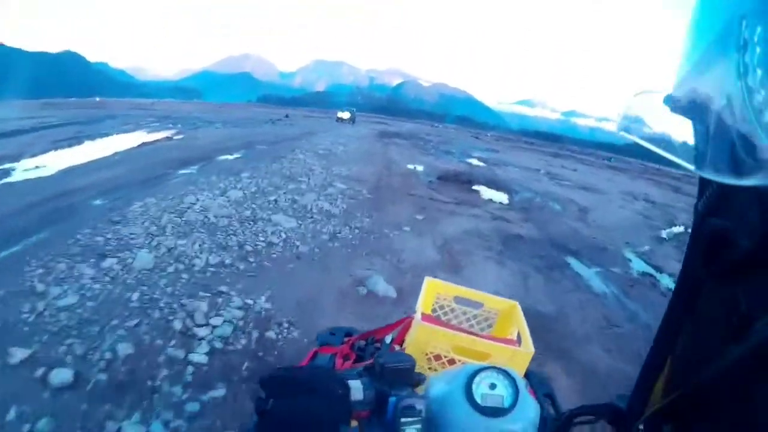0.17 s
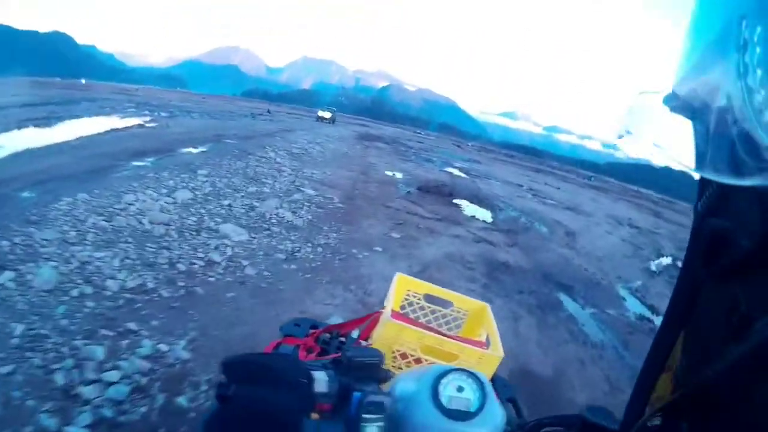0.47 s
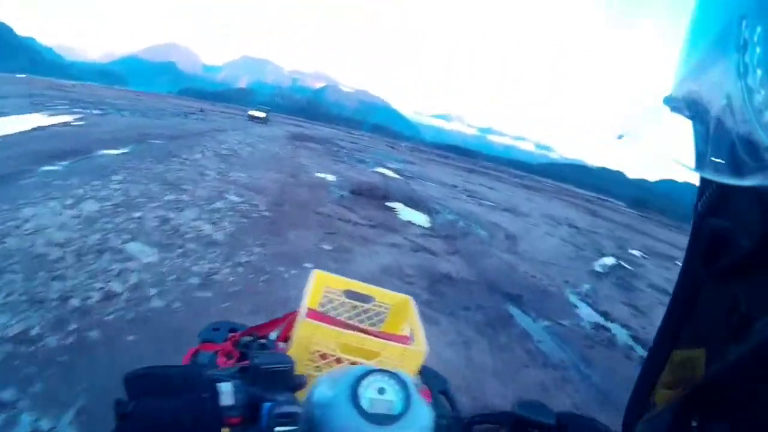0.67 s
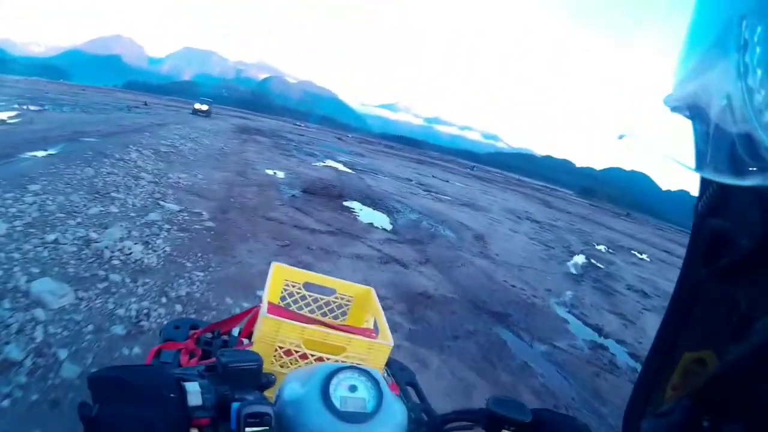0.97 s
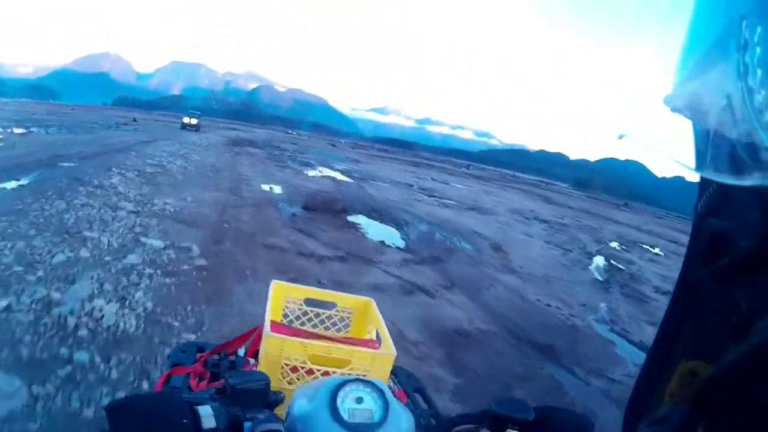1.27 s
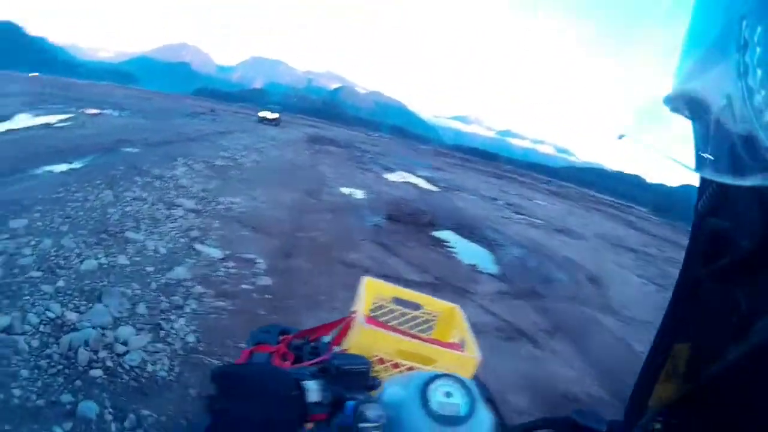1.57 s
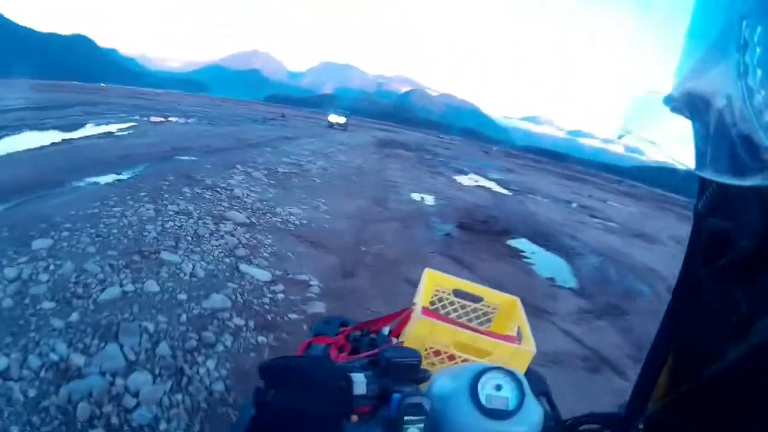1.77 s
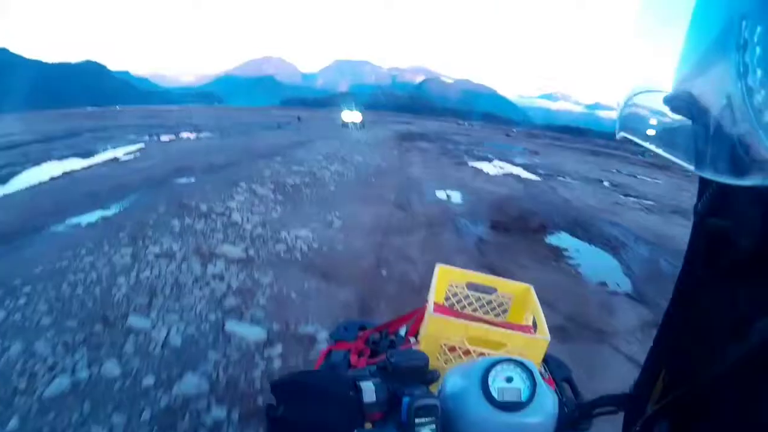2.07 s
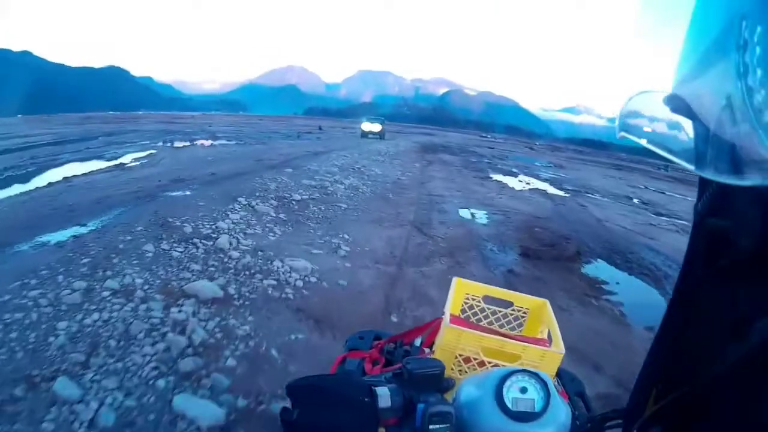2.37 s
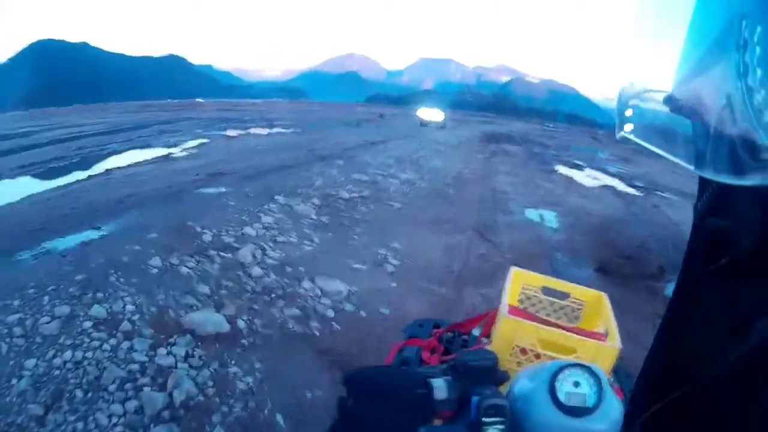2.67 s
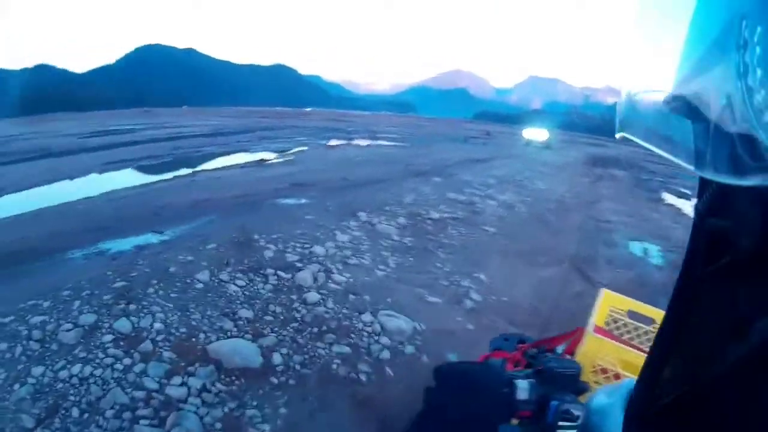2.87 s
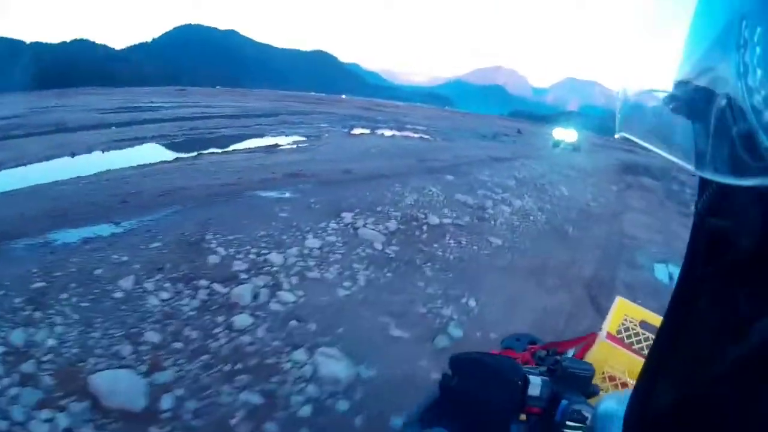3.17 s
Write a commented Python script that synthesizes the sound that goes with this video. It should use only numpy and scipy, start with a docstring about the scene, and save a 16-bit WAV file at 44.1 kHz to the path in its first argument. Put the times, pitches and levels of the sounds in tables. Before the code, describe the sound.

A quad bike engine runs continuously from 0 to 3.3 seconds, about 26 thumps a second fusing into a boomy, buzzing drone. Pitch wavers slightly and sags a little after 2 seconds. A rough, pulsing roar of gas, tyres and wind surrounds it. Brief dull rattles tick irregularly, clustering around 1.2-1.4 seconds. Open outdoors, close muffled mono microphone, with very faint hiss and thin high whine.

```python
"""On a gravel track a single-cylinder quad bike is ridden at a steady pace, heard by a muffled helmet camera.
Each firing thumps through the exhaust as a sum of harmonic orders whose phases shape the pulse.
Gas rush, tyres and wind are noise in the resonances of machine and housing, gusting with the engine cycle.
The load rattles as short decaying modes; the electronics add steady hiss and a cluster of thin whining lines."""
import sys
import numpy as np
from scipy import signal
from scipy.fft import rfft, irfft
from scipy.io import wavfile

SR = 44100
rng = np.random.default_rng(int(sys.argv[2]) if len(sys.argv) > 2 else 0)


def pcm_store(signal):
    """Save signal as 16-bit PCM."""
    levels = np.round(np.clip(np.atleast_2d(signal), -1, 1) * 32767)
    wavfile.write(sys.argv[1], SR, levels.astype(np.int16).T)


N = 146412


def amp(db):
    """Level law: decibels become a linear gain."""
    return 10 ** (np.asarray(db) / 20)


def rms_one(x):
    """Power normalization: scale a signal to rms 1."""
    return x / np.sqrt(np.mean(x ** 2) + 1e-20)


def in_time(rows):
    """Linear interpolation: the columns after the time column become curves with one value per sample."""
    s, *columns = np.transpose(rows)
    return [np.interp(np.arange(N) / SR, s, column) for column in columns]


def drift(rate_hz):
    """Low-passed noise: two equal real poles at rate_hz leave a slow random curve of spread 1."""
    step = 40  # samples between computed points
    r = np.exp(-2 * np.pi * rate_hz * step / SR)
    noise = rng.standard_normal(N // step + 2002)
    slow = signal.lfilter([1], [1, -2 * r, r * r], noise)[2000:]  # drop the settling of the filter
    return np.interp(np.arange(N) / step, np.arange(len(slow)), rms_one(slow))


def resonate(x, hz, width_hz):
    """Damped oscillator: a conjugate pole pair passes a band of the given width."""
    r = np.exp(-np.pi * width_hz / SR)
    return signal.lfilter([1 - r, 0, r - 1], [1, -2 * r * np.cos(2 * np.pi * hz / SR), r * r], x + 1e-18)


def wandering(hz, width_hz):
    """Heterodyning: low-passed complex noise on a gliding carrier is noise in a moving resonance."""
    r = np.exp(-np.pi * width_hz / SR)
    noise = rng.standard_normal(N) + 1j * rng.standard_normal(N)
    envelope = signal.lfilter([1], [1, -2 * r, r * r], noise)
    carrier = np.exp(2j * np.pi * np.cumsum(hz) / SR)
    return (envelope * carrier).real


def electronics():
    """Circuit noise: spectrally shaped hiss, and sinusoids broadened by phase drift."""
    # Spectrum of the hiss. Each row: frequency in Hz, relative level in dB.
    hiss_shape = [(3000, -4), (5000, -2), (7000, 2), (9000, 0), (14000, 0), (15500, -4)]
    # Lines of the whine. Each row: frequency in Hz, rms level in dB.
    whine_lines = [(9420, -97), (9489, -87), (9525, -86), (9562, -87), (9635, -96)]
    hiss_db = -69.5

    hz = np.fft.rfftfreq(N, 1 / SR)
    at_hz, shape_db = np.transpose(hiss_shape)
    gain = amp(np.interp(np.log(hz + 1), np.log(at_hz), shape_db))
    hiss = irfft(rfft(rng.standard_normal(N)) * gain, N)

    t = np.arange(N) / SR
    whine = 0
    for line_hz, db in whine_lines:
        whine = whine + np.sqrt(2) * amp(db) * np.sin(2 * np.pi * line_hz * t + .5 * drift(4))
    return amp(hiss_db) * rms_one(hiss) + whine


def roar(turn):
    """Source and filter: patchy noise in resonances, its level modulated by the engine cycle."""
    # Gas rush through one engine cycle, choked after the firing, then in three gusts.
    # Each row: phase in turns, level in dB.
    stroke = [(0, 1.5), (.1, -2.5), (.2, -4.5), (.33, 2), (.53, -1.5), (.65, 1), (.75, -1), (.92, 2.5),
              (1, 1.5)]
    # Slow levels of the roar. Each row: time in seconds, upper roar in dB, treble roar in dB,
    # lower wandering resonance in dB, upper wandering resonance in dB.
    roar_levels = [(0.0, -38, -72, -34, -30), (0.03, -38.5, -62.5, -31, -28.5),
                   (0.71, -37, -57, -27, -31.5), (0.83, -36.5, -58.5, -32, -31.5),
                   (0.89, -39, -56.5, -26, -32.5), (1.37, -38, -60, -28, -28),
                   (1.56, -37.5, -60.5, -26.5, -41), (1.62, -37.5, -58.5, -31, -39),
                   (1.87, -39, -60, -32, -28.5), (1.92, -37.5, -59, -43, -41), (1.95, -37.5, -59, -30, -44),
                   (2.08, -38, -61.5, -28, -27), (2.21, -39, -62.5, -34, -28),
                   (2.35, -39.5, -62, -34.5, -34), (2.93, -39, -62, -31.5, -27),
                   (3.28, -41.5, -61.5, -38, -32.5)]
    # Fixed resonances. Each row: centre in Hz, width of one pass in Hz, level in dB
    # (in the upper and treble bodies relative to their slow level).
    low_body = [(24.9, 40, -69.5), (105.4, 25, -46), (196, 100, -42.5), (264.6, 130, -39.5),
                (364, 42, -41.5), (437.5, 100, -38), (634, 200, -36), (786, 172, -38)]
    high_body = [(923, 387, 1), (1237, 63, -11), (1477, 170, -10), (1787, 880, -10.5), (2199, 350, -15.5)]
    treble_body = [(2620, 470, -7.5), (3140, 340, -5), (3840, 170, -10.5), (4286, 220, -15),
                   (5580, 500, -7)]
    # The two wandering resonances. Each row: width of one pole in Hz, level in dB relative to the slow level.
    mid_body = [(90, -2.5), (130, -3)]
    # Their centres. Each row: time in seconds, lower centre in Hz, upper centre in Hz.
    mid_centres = [(0.0, 535, 715), (0.2, 528, 724), (0.451, 547.4, 670.2), (0.65, 519, 714.2),
                   (0.999, 535, 719.6), (1.299, 545, 704), (1.551, 545, 700), (1.751, 526.2, 720),
                   (1.999, 524.3, 715), (2.12, 545, 683.5), (2.299, 520, 719), (2.6, 556, 682),
                   (2.8, 520, 736.6), (2.95, 546, 705), (3.2, 537, 724.4), (3.32, 545, 705)]
    low_share, high_share, treble_share = .15, .5, .35  # part of the stroke's dB swing each body takes
    low_fade_db_per_s = -0.44  # the low roar eases off
    patchy_db = .5  # scale of the random level changes

    stroke_db = np.interp(turn % 1, *np.transpose(stroke))
    high_db, treble_db, *mid_db = in_time(roar_levels)
    bodies = [
        (low_body, low_share * stroke_db + low_fade_db_per_s * np.arange(N) / SR),
        (high_body, high_db + high_share * stroke_db),
        (treble_body, treble_db + treble_share * stroke_db)]

    out = 0
    together = drift(21)  # patchiness common to all resonances
    for body, level_db in bodies:
        for hz, width_hz, db in body:
            patch_db = patchy_db * (1.47 * together + drift(4.4))
            rush = rng.standard_normal(N) * amp(patch_db)
            band = resonate(resonate(rush, hz, width_hz), hz, width_hz)
            out = out + amp(db + level_db) * rms_one(band)
    for hz, (width_hz, db), level_db in zip(in_time(mid_centres), mid_body, mid_db):
        patch_db = patchy_db * (1.1 * together + drift(5.3))
        out = out + amp(db + level_db + stroke_db + patch_db) * rms_one(wandering(hz, width_hz))
    return out


def rattles():
    """Modal decay: each knock of the load excites damped modes, the higher ones dying sooner."""
    # Knocks of the load. Each row: start in seconds, level in dB, pitch in Hz.
    knocks = [(0.24, -32, 1516), (0.3187, -38, 1600), (0.389, -36, 1510), (0.809, -40, 1457),
              (1.109, -50, 3150), (1.177, -51.5, 4350), (1.179, -31, 1434), (1.1995, -33, 1625),
              (1.2365, -34, 1600), (1.324, -35, 1616), (1.332, -53, 3160), (1.349, -32, 1640),
              (1.364, -31, 1560), (1.6075, -32, 1465), (1.79, -31, 1474), (1.902, -32, 1533),
              (2.005, -36, 1560), (2.138, -37, 1470), (2.3655, -30, 1341), (2.8597, -46, 1424),
              (3.1449, -34.5, 1510)]
    # Modes of a knock. Each row: multiple of its pitch, level in dB relative to the knock.
    modes = [(1, 1), (1.42, -14.5), (2.1, -24), (3.05, -26.5)]
    t60_s, rise_s = .05, .001  # 60 dB decay time at the pitch itself; soft start

    out = np.zeros(N)
    for s, db, hz in knocks:
        start = int(s * SR)
        t = np.arange(min(int(t60_s * SR), N - start)) / SR
        rise = np.sin(np.pi / 2 * np.minimum(t / rise_s, 1)) ** 2
        ring = 0
        for k, mode_db in modes:
            ring = ring + amp(db + mode_db - 60 * k * t / t60_s) * np.sin(2 * np.pi * k * hz * t)
        out[start:start + len(t)] += rise * ring
    return out


def exhaust(turn):
    """Fourier synthesis: harmonics of the firing rate, their phases bent by the dispersion of the pipe."""
    # Exhaust orders. Each row: multiple of the firing rate, level in dB
    # (the level is unused for the orders that have a slow level below).
    orders = [(1, -17), (2, -7), (3, -7), (4, -1), (5, 0), (6, -14.5), (7, -30), (8, -12.5), (9, -5.5),
              (10, -9.5), (11, -11.5), (12, -13), (13, -4.5), (14, -19.5), (15, -13.5), (16, -20.5),
              (17, -21), (18, -13.5), (19, -15.5), (20, -11), (21, -16.5), (22, -18.5), (23, -16),
              (24, -11), (25, -11), (26, -12.5), (27, -11), (28, -13), (29, -16.5), (30, -14.5)]
    # Slow level of the boom. Each row: time in seconds, 4th order in dB, 5th order in dB.
    boom = [(0.05, -28.5, -28.5), (0.6, -27, -29.5), (0.85, -28.5, -28.5), (1.15, -28.5, -27.5),
            (1.5, -31.5, -27.5), (1.72, -29, -29.5), (1.95, -28.5, -28.5), (2.1, -30, -26.5),
            (2.27, -31.5, -26.5), (2.45, -29.5, -27.5), (2.9, -30, -27.5), (3.25, -32, -28)]
    # Upper orders with a slow level of their own, as multiples of the firing rate.
    strong = (9, 13, 20, 24, 27)
    # Slow level of these orders. Each row: time in seconds, then the level of each strong order in dB.
    upper = [(0.0, -37, -43, -42, -42, -44), (0.3, -35.5, -40, -43, -41, -41),
             (0.47, -35.5, -42, -47, -33, -41), (0.8, -36, -38, -49, -47, -43),
             (1.1, -36, -37, -40, -41, -37), (1.35, -37, -35, -39, -47, -42),
             (1.7, -38, -40, -36, -46, -39), (1.92, -36, -38, -40, -49, -47),
             (2.08, -37, -37, -43, -35, -49), (2.3, -41, -36, -42, -45, -38),
             (2.6, -43, -37, -49, -40, -43), (2.9, -40, -37, -46, -50, -42), (3.3, -47, -37, -52, -46, -50)]
    # Resonances of the pipe, each delaying the orders around it. Each row: centre in orders, width in orders.
    pipe = [(4.15, .4), (9.5, .15), (14.2, 1.1)]
    random_phase = range(15, 20)  # the weak middle orders start at random phases, so the pulse is less peaky
    exhaust_db = -32.5
    waver_db, waver_rad, clean_orders = .6, .055, 6.5  # wavering grows above the clean orders
    thump_lead_turn, thump_lag_rad = .12, 5.6  # timing and phase of the thump, before the pipe
    lead_rad, spread_rad = .45, .005  # the pipe smears the pulse: high orders arrive first

    slow_db = dict(zip((4, 5) + tuple(strong), in_time(boom) + in_time(upper)))
    out = 0
    for k, db in orders:
        loose = 1 + (k / clean_orders) ** 2
        most_waver_db = 1.5 if k in slow_db else 3
        level_db = slow_db.get(k, exhaust_db + db) + np.minimum(waver_db * loose, most_waver_db) * drift(9)
        if k < random_phase[0]:
            pipe_lag = sum(np.arctan((k - at) / width) for at, width in pipe)
            offset = 2 * np.pi * k * thump_lead_turn - thump_lag_rad - pipe_lag
        else:
            offset = lead_rad + spread_rad * k * k
            if k in random_phase and k not in slow_db:
                offset += rng.uniform(0, 2 * np.pi)
        phase = 2 * np.pi * k * turn + offset + waver_rad * loose * drift(2.5)
        out = out + np.sqrt(2) * amp(level_db) * np.cos(phase)
    return out


def housing(outside):
    """Transmission loss: the camera housing dips at two resonances and muffles the treble."""
    # Dips of the housing. Each row: centre in Hz, width in Hz.
    dips = [(2800, 70), (3530, 140)]
    for hz, width_hz in dips:
        outside = outside - .6 * resonate(outside, hz, width_hz)
    return signal.sosfilt(signal.butter(6, 4290, fs=SR, output="sos"), outside)


def scene():
    """Superposition: airborne sources pass the housing, the electronics add directly, in mono."""
    # Each row: time in seconds, firing rate in Hz.
    firing = [(0.0, 26.55), (0.195, 26.27), (0.391, 26.79), (0.586, 27.0), (0.781, 26.39), (0.976, 26.56),
              (1.172, 26.52), (1.367, 25.92), (1.562, 26.01), (1.758, 26.57), (1.953, 26.46),
              (2.148, 25.55), (2.344, 25.71), (2.539, 26.01), (2.734, 25.8), (2.929, 25.56), (3.125, 25.33),
              (3.32, 26.32)]
    start_turn = -.086
    # Phase is the integral of the firing rate, in engine cycles.
    turn = start_turn + np.cumsum(in_time(firing)[0]) / SR
    outside = roar(turn) + rattles() + exhaust(turn)
    return (electronics() + housing(outside))[None]


def record(dry):
    """Band limiting: a steep elliptic low-pass cuts the top above 15.5 kHz."""
    return signal.sosfilt(signal.ellip(12, .5, 80, 15500, fs=SR, output="sos"), dry)


dry = scene()
out = record(dry)
pcm_store(out)
```